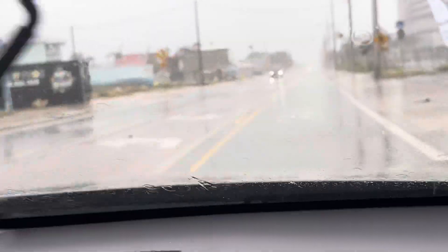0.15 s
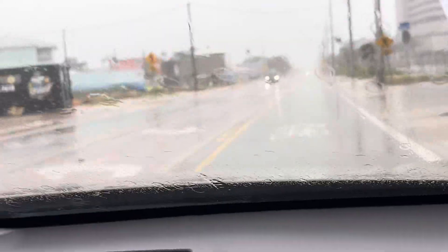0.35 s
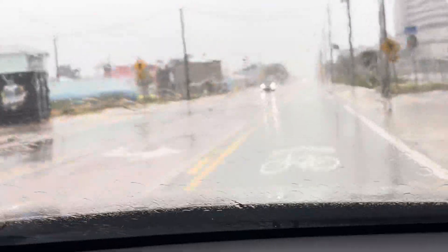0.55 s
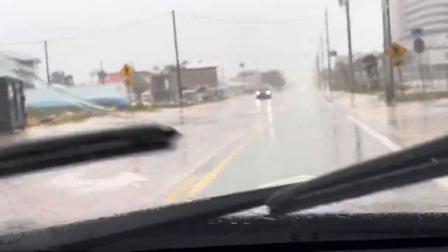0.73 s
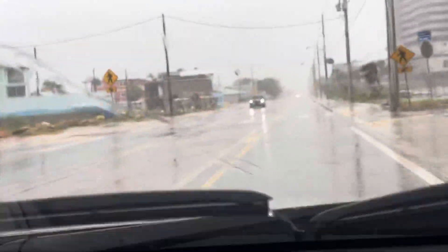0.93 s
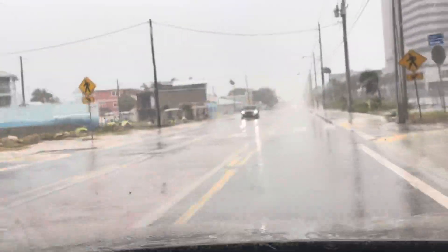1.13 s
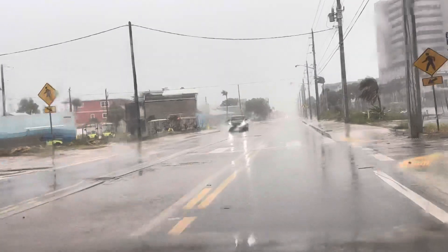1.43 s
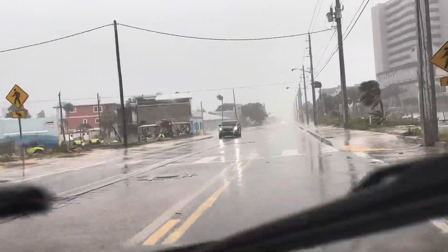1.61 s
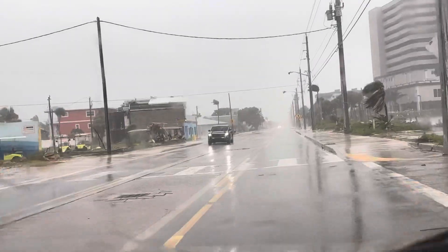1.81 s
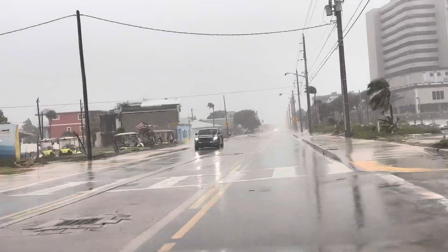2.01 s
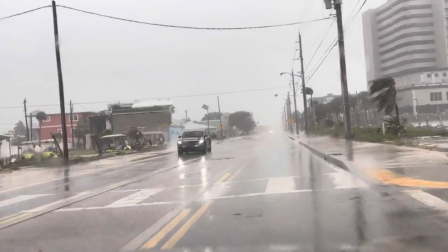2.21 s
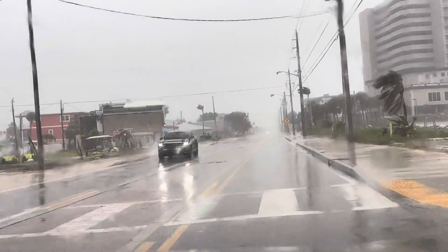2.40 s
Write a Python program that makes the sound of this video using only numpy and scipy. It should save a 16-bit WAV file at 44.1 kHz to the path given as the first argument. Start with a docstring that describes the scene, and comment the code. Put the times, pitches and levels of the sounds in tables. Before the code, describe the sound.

Heavy rain beats on a car's roof and glass, heard close in stereo from inside the cabin; low engine hum and tyre rumble continue beneath, with soft booming bumps and one sharp snap near the end.

```python
"""Inside a car rolling slowly through a downpour, rain close all around and heard in stereo.
Small drops, as clicks with noisy splashes, patter on the windscreen; fat drops tick, tap and once snap hard.
Dull filtered impacts drum on the roof, where larger drops ring the metal as short decaying tones.
Beneath lie an engine hum of sine orders, tyre rumble of filtered noise, and bumps that boom and thud."""
import sys
import numpy as np
from scipy import signal
from scipy.fft import rfft, irfft
from scipy.io import wavfile

SR = 44100
rng = np.random.default_rng(int(sys.argv[2]) if len(sys.argv) > 2 else 0)


def to_wav(sig):
    """Store sig (one row per channel, or 1-D mono) as 16-bit WAV at the path in sys.argv[1].

    Samples outside -1..1 are clipped; the rate is SR.
    """
    pcm = np.clip(np.atleast_2d(sig), -1, 1) * 32767
    pcm = np.round(pcm).astype(np.int16)
    wavfile.write(sys.argv[1], SR, pcm.T)  # frames by channels


N = 112454

# engine under the other sounds: (time [s], firing rate [Hz], level before the order levels [dB])
ENGINE = [(0,56.23,-22),(.2,59.26,-23.5),(.3,60.6,-17.5),(.55,63.42,-15.5),(.75,63.95,-14),(.85,66.73,-21),(1.05,67.67,-22.5),(1.25,65.9,-25),(1.65,65.35,-20),(1.98,63.9,-16.5),(2.08,62.5,-22.5),(2.55,61.2,-29)]
# engine orders: (multiple of the firing rate [-], level relative to the engine [dB])
ENGINE_ORDERS = [(1,-3.5),(2,-18.5),(3,-21),(3.5,-22.5)]
# tyre rumble from below: (time [s], level [dB])
RUMBLE = [(0,-25),(.45,-23),(.8,-24),(1.2,-25),(1.55,-25),(1.95,-25.5),(2.07,-28.5),(2.17,-24.5),(2.45,-23.5),(2.53,-27.5)]
# road bumps: (middle of the swell [s], pitch at that moment [Hz], peak level [dB], length between 1/e points [s])
BUMPS = [(.015,94,-17.5,0.012),(0.877,90.5,-10.5,0.054),(1.347,66,-9,0.019),(1.792,83,-16,0.05),(2.019,92.64,-12,0.16),(2.171,75.1,-8.5,0.1),(2.44,78.6,-13,0.046)]
# body thuds with some bumps: (middle of the swell [s], level [dB])
THUDS = [(0.879,-16.5),(1.35,-27),(1.793,-20),(2.16,-26.5)]
# fat drops on the roof: (time [s], level [dB], panel pitch [Hz], decay time [s])
ROOF_KNOCKS = [(.251,-51,420,0.0036),(.4314,-19.5,456,0.0038),(.69,-40,444.1,.004),(.729,-31,407,0.0052),(1.0515,-26.5,418,0.0067),(1.3422,-25.5,447,0.0058),(1.488,-24.5,438,0.0058),(1.931,-24.5,336,0.0041),(2.111,-28,404,0.0034),(2.224,-26.5,403.3,0.0048),(2.2541,-20,426.6,0.0061)]
# roof panel modes: (multiple of the panel pitch [-], level [dB], multiple of the decay time [-])
PANEL_MODES = [(1.001,1.5,1),(1.48,-9.5,1.1),(1.87,-14.5,1.3),(2.45,-22.5,1)]
# rain on the glass in gusts: (time [s], level before GLASS_DB [dB])
GUSTS = [(0,-44.5),(.08,-48.5),(.25,-49),(.31,-51.5),(.46,-52),(.51,-45),(.59,-50.5),(.81,-51),(.87,-46.5),(1.09,-47.5),(1.14,-41),(1.25,-43),(1.29,-47.5),(1.42,-50),(1.62,-47.5),(1.68,-47.5),(1.76,-42.5),(1.93,-49),(2.03,-48.5),(2.12,-45.5),(2.16,-43.5),(2.23,-43),(2.34,-46),(2.55,-50)]
# fat drops on the glass: (time [s], starting level of the ring [dB])
TICKS = [(.0175,-42),(.738,-49),(1.095,-48),(1.311,-46.5),(1.318,-44.5),(1.375,-62),(1.8775,-39.5)]
# duller drops on the side windows: (time [s], starting level of the ring [dB])
TAPS = [(.108,-40.5),(.24,-37),(.36,-40),(1.759,-37),(1.789,-55),(2.186,-60),(2.411,-37.5)]
# a sharp double snap and its rattle: (time [s], starting level of the short ring [dB])
SNAPS = [(2.2764,-22),(2.2774,-30.5),(2.2859,-18),(2.2884,-29),(2.2937,-37)]

# spectral shapes, each scaled to keep the power of white noise: (frequency [Hz], relative level [dB per Hz])
ROAD_SPECTRUM = [(18,-56.5),(30,-18.5),(45,2.5),(65,-3),(90,3.5),(125,-7),(165,-8.5),(230,-9.5),(275,-12.5),(320,-23),(600,-30),(1200,-64),(5000,-83.5)]
THUD_SPECTRUM = [(20,-53),(60,-16),(140,4.5),(195,7.5),(250,-10.5),(600,-39),(3000,-81)]
ROOF_SPECTRUM = [(150,-6),(300,0),(400,0.5),(550,-4),(720,-7.5),(840,-8),(1050,-16.5),(1600,-18),(3000,-52)]
GLASS_SPECTRUM = [(600,3.5),(1300,-2.5),(1700,0.5),(2200,3.5),(2600,2),(3600,0.5),(5200,1),(7000,-6.5),(8800,-7.5),(10500,-10.5),(12000,-35),(15000,-13.5)]
TICK_SPECTRUM = [(1000,-26),(2500,-5.5),(3800,1),(5000,1.5),(7000,-5.5),(9000,-4.5),(12000,-27),(15000,-12)]
TAP_SPECTRUM = [(700,-7.5),(1500,1.5),(2600,3),(4000,-5),(8000,-20),(14000,-22)]
SNAP_SPECTRUM = [(600,-10),(1100,-7),(2500,0.5),(3700,-0.5),(4900,8),(7000,1.5),(9500,3),(12000,-17.5),(14500,-3.5)]
# gain applied to the side noise of the road: (frequency [Hz], gain [dB])
ROAD_WIDTH = [(40,-16),(80,-24.5),(150,-16),(280,-7.5),(600,-5.5)]
# side against mid on the glass, capped at 0 dB in use: (frequency [Hz], gain [dB])
GLASS_WIDTH = [(1000,7),(1500,-3),(2100,-11.5),(4000,-53),(5700,-13),(7500,-3.5),(9500,-17),(13000,50)]

# left over right [dB]
BASS_PAN_DB, ROOF_PAN_DB = -1.4, 3
BOOM_SAG_HZ_PER_S, THUD_S = 48, 0.047  # thud length between 1/e points
CABIN_HZ, CABIN_WIDTH_HZ, CABIN_DB = 91, 12.7, -6.5  # resonance, level relative to the rumble
ROOF_DB, ROOF_SIDE_DB = -42, -2
ROOF_DROPS_PER_S, ROOF_SCATTER_DB = 900, 2.5
PANEL_ATTACK_S = 0.00051
SMALL_KNOCK_DB, SMALL_KNOCK_SCATTER_DB = -37, 3.5
SMALL_KNOCK_HZ, SMALL_KNOCK_OCTAVES, SMALL_KNOCK_DECAY_S = 384.7, 0.31, 0.007  # centre, spread, decay
GLASS_DB, GLASS_DROPS_PER_S, GLASS_SCATTER_DB = 2.5, 3500, 3.5
SPLASH_S, SPLASH_DB = 0.004, 2.5  # decay of splash energy, level relative to the impacts
TICK_CLICK_DB, SNAP_TAIL_DB = 24, -18
TOP_HZ = 16000


def undb(db):
    """Decibels to gain."""
    return 10 ** (np.asarray(db) / 20)


def unit(x):
    """Scale to rms 1."""
    return x / np.sqrt(np.mean(x ** 2))


def curve(rows, col=1):
    """A table column joined by straight lines in time."""
    rows = np.array(rows)
    return np.interp(np.arange(N) / SR, rows[:, 0], rows[:, col])


def response(points, size):
    """Gain of (Hz, dB) points at the frequencies of a transform."""
    hz, db = np.array(points).T
    bins_hz = np.fft.rfftfreq(size, 1 / SR)
    return undb(np.interp(np.log(bins_hz + 1), np.log(hz), db))  # +1 avoids log of zero


def colour(x, points, normalise=True):
    """Causal filter through (Hz, dB) points; when normalised, white noise keeps its power."""
    gain = response(points, size=2 * N)
    # fold the cepstrum to positive times: minimum phase, so nothing sounds before its impact
    cepstrum = irfft(np.log(unit(gain) if normalise else gain))
    cepstrum[1:N] *= 2
    cepstrum[N + 1:] = 0
    return irfft(rfft(x, 2 * N) * np.exp(rfft(cepstrum)))[:N]


def stereo(mid, side=0, pan_db=0):
    """Left and right from mid and side, with left raised over right by pan_db."""
    return np.array([mid + side, mid - side]) * undb([[pan_db / 2], [-pan_db / 2]])


def noise():
    """White noise."""
    return rng.standard_normal(N)


def swell(t, middle, length):
    """Bell-shaped rise and fall, with length between its 1/e points."""
    return np.exp(-(2 * (t - middle) / length) ** 2)


def shower(per_s, scatter_db):
    """Impacts at random moments: many small, a few large."""
    size = undb(scatter_db * np.minimum(rng.exponential(size=N), 5.5))
    lands = rng.random(N) < per_s / SR
    return unit(lands * size * rng.choice([-1, 1], N))


def blows(rows, decay_s, click_db):
    """Each blow is a click of contact and a noisy ring that dies away."""
    t, ring, clicks = np.arange(N) / SR, 0, np.zeros(N)
    for start, db in rows:
        decay = np.exp(-np.maximum(t - start, 0) / decay_s)
        ring = ring + (t >= start) * undb(db) * decay
        clicks[int(start * SR)] = undb(db + click_db)
    return clicks + ring * noise()


def engine():
    """A low hum: sines at multiples of the drifting firing rate, the higher orders weak."""
    phase = 2 * np.pi * np.cumsum(curve(ENGINE)) / SR
    hum = 0
    for multiple, db in ENGINE_ORDERS:
        tone = np.sqrt(2) * np.sin(multiple * phase + rng.uniform(0, 2 * np.pi))
        hum = hum + undb(db) * tone
    return stereo(undb(curve(ENGINE, 2)) * hum, pan_db=BASS_PAN_DB)


def road():
    """Tyre rumble and a resonant cabin hum; bumps swell into sagging booms, some with a noisy body thud."""
    t = np.arange(N) / SR
    mid, side = (undb(curve(RUMBLE)) * colour(noise(), ROAD_SPECTRUM) for _ in range(2))
    resonance = signal.iirpeak(CABIN_HZ, CABIN_HZ / CABIN_WIDTH_HZ, fs=SR)
    cabin = signal.lfilter(*resonance, colour(noise(), ROAD_SPECTRUM))
    mid = mid + undb(curve(RUMBLE) + CABIN_DB) * unit(cabin)
    for at, hz, db, length in BUMPS:
        cycles = (hz - BOOM_SAG_HZ_PER_S * (t - at) / 2) * (t - at)  # pitch falls steadily
        mid = mid + undb(db) * swell(t, at, length) * np.cos(2 * np.pi * cycles)
    thuds = sum(undb(db) * swell(t, at, THUD_S) for at, db in THUDS)
    mid = mid + thuds * colour(noise(), THUD_SPECTRUM)
    return stereo(mid, colour(side, ROAD_WIDTH, normalise=False), BASS_PAN_DB)


def knocks(rows):
    """Each drop sets a patch of roof ringing: a few decaying sine modes with a soft attack."""
    out, t = np.zeros(N + SR), np.arange(SR // 10) / SR
    attack = 1 - np.exp(-t / PANEL_ATTACK_S)
    for start, db, hz, decay_s in rows:
        ring = 0
        for multiple, mode_db, slow in PANEL_MODES:
            mode = np.sin(2 * np.pi * hz * multiple * t) * np.exp(-t / (decay_s * slow))
            ring = ring + undb(mode_db) * mode
        at = int(start * SR)
        out[at:at + len(t)] += undb(db) * ring * attack
    return out[:N]


def small_knocks(count):
    """Lesser drops ring the roof at random moments, each with its own level and pitch."""
    size, pitch = rng.standard_normal((count, 2)).T
    starts = rng.random(count) * N / SR
    levels_db = SMALL_KNOCK_DB + SMALL_KNOCK_SCATTER_DB * size
    pitches_hz = SMALL_KNOCK_HZ * 2 ** (SMALL_KNOCK_OCTAVES * pitch)
    return knocks(zip(starts, levels_db, pitches_hz, np.full(count, SMALL_KNOCK_DECAY_S)))


def roof_layer():
    """One independent layer of dull drumming with lesser knocks in it."""
    drumming = colour(shower(ROOF_DROPS_PER_S, ROOF_SCATTER_DB), ROOF_SPECTRUM)
    return undb(ROOF_DB) * drumming + small_knocks(count=50)


def roof():
    """Rain drums on the lined metal roof, dull and wide overhead; fat drops knock on it."""
    mid, side = roof_layer(), roof_layer()
    return stereo(mid + knocks(ROOF_KNOCKS), undb(ROOF_SIDE_DB) * side, ROOF_PAN_DB)


def patter():
    """Gusts of small drops on the windscreen, each an impact with a brief noisy splash."""
    drops = shower(GLASS_DROPS_PER_S, GLASS_SCATTER_DB)
    splash_energy = signal.lfilter([1], [1, -np.exp(-1 / (SPLASH_S * SR))], drops ** 2)
    splash = noise() * np.sqrt(splash_energy)
    rain = unit(drops + undb(SPLASH_DB) * unit(splash))
    return colour(rain, GLASS_SPECTRUM) * undb(curve(GUSTS) + GLASS_DB)


def snap():
    """A hard double snap and rattle: short blows over a fainter, longer tail."""
    tail = blows(SNAPS, decay_s=0.0097, click_db=5)
    return colour(blows(SNAPS, decay_s=0.0012, click_db=2.5) + undb(SNAP_TAIL_DB) * tail, SNAP_SPECTRUM)


def glass():
    """Patter on the windscreen, fat drops ticking, duller taps on the side windows and the snap."""
    mid = patter() + snap()
    mid = mid + colour(blows(TICKS, decay_s=0.013, click_db=TICK_CLICK_DB), TICK_SPECTRUM)
    mid = mid + colour(blows(TAPS, decay_s=0.0024, click_db=10.5), TAP_SPECTRUM)
    # the sound reaches the two microphone ports out of phase: the side is mid turned a quarter cycle
    width = np.minimum(response(GLASS_WIDTH, size=N), 1)
    side = irfft(1j * width * rfft(mid), N)
    return stereo(mid, side)


def scene():
    """Rain on roof and glass over the noise of driving."""
    return engine() + road() + roof() + glass()


def record(dry):
    """The phone cuts the top: a steep low-pass filter."""
    return signal.sosfilt(signal.ellip(8, .2, 70, TOP_HZ, fs=SR, output="sos"), dry)


dry = scene()
out = record(dry)
to_wav(out)
```